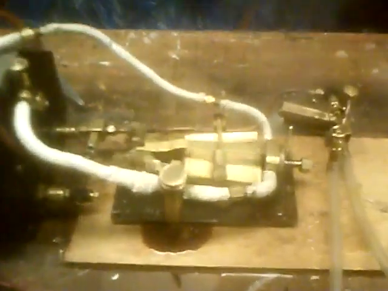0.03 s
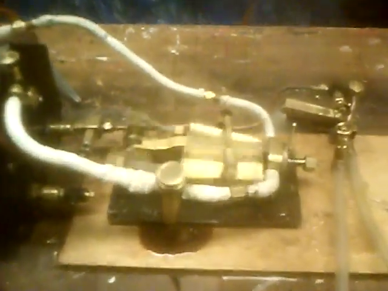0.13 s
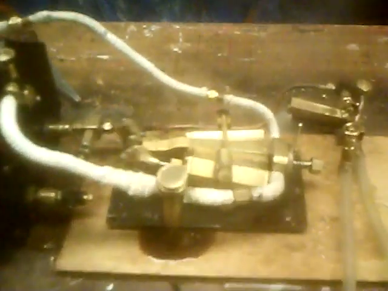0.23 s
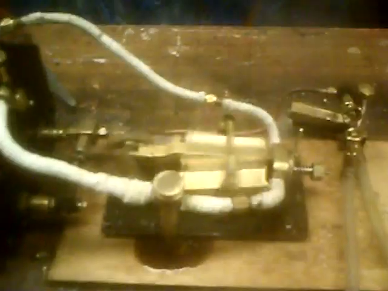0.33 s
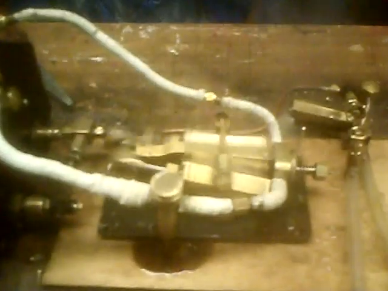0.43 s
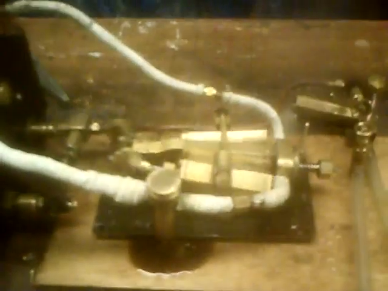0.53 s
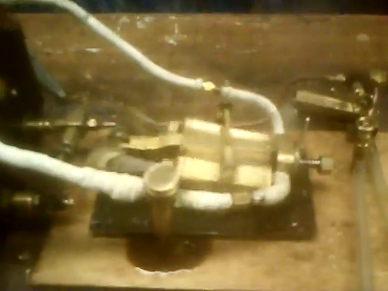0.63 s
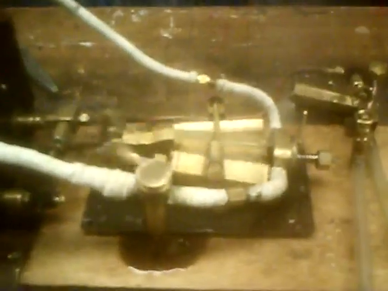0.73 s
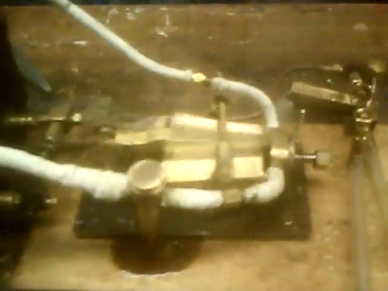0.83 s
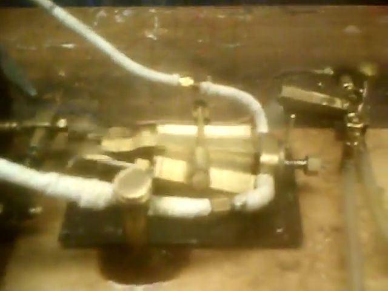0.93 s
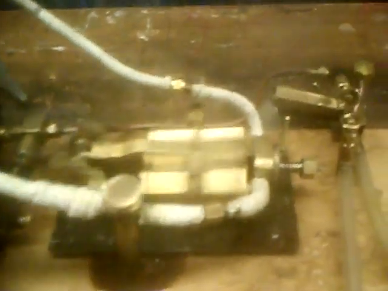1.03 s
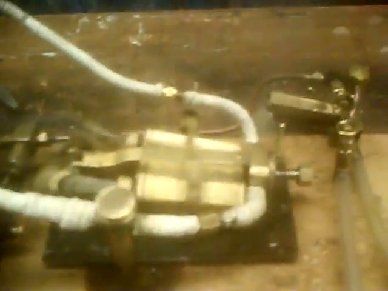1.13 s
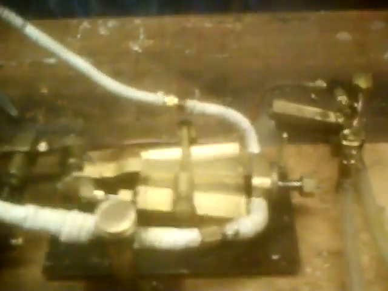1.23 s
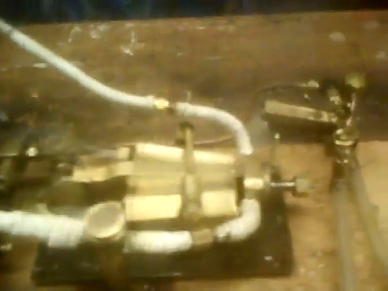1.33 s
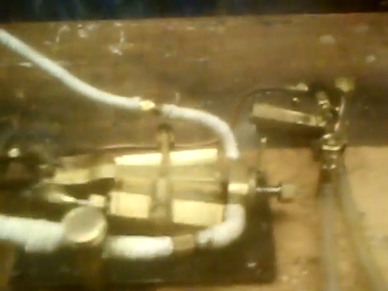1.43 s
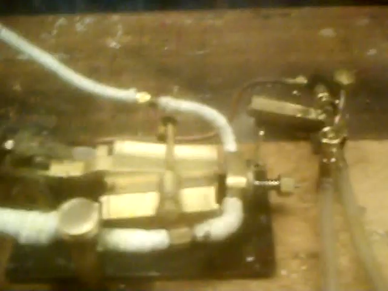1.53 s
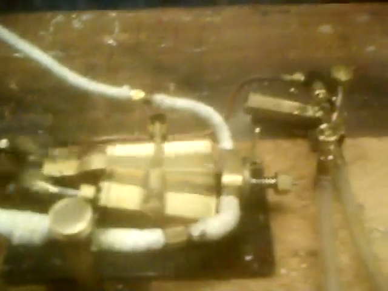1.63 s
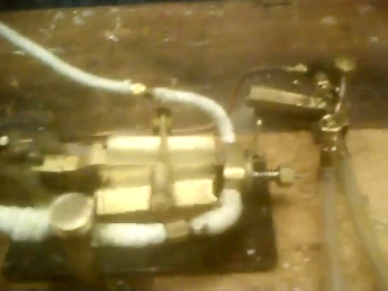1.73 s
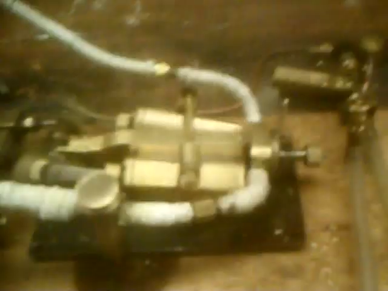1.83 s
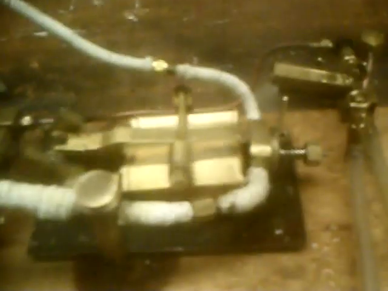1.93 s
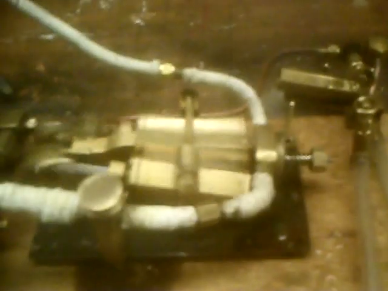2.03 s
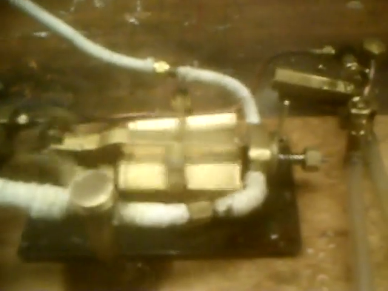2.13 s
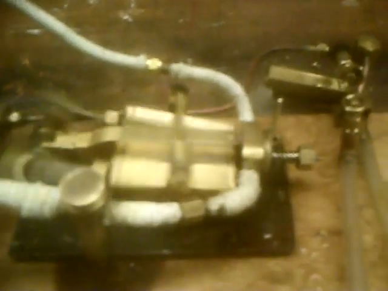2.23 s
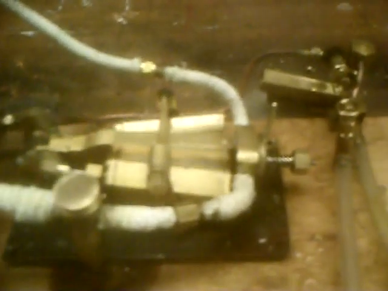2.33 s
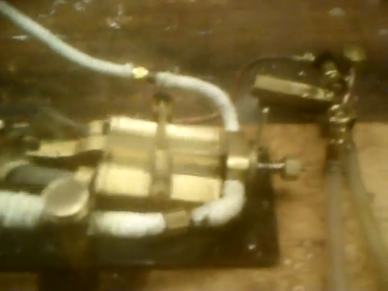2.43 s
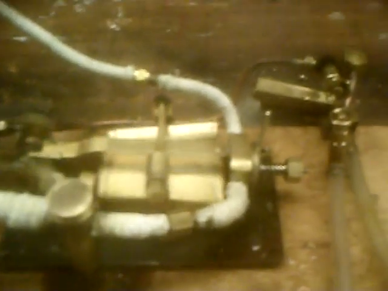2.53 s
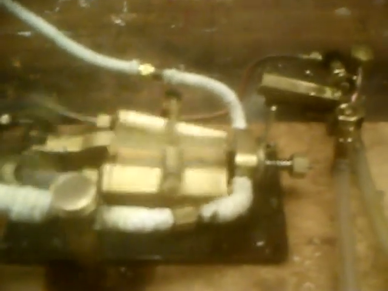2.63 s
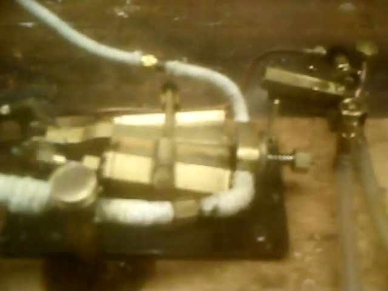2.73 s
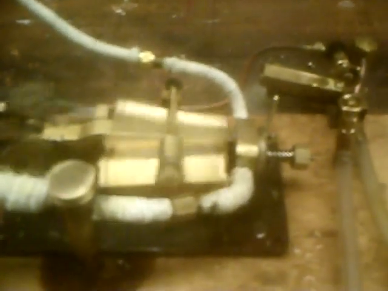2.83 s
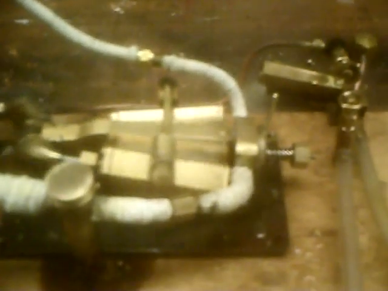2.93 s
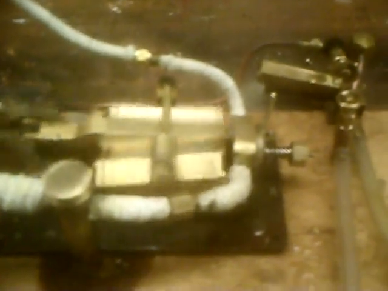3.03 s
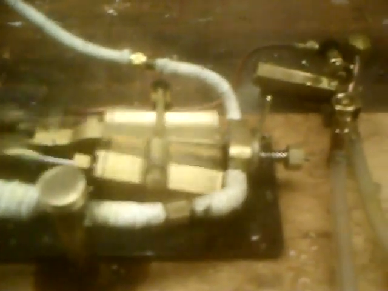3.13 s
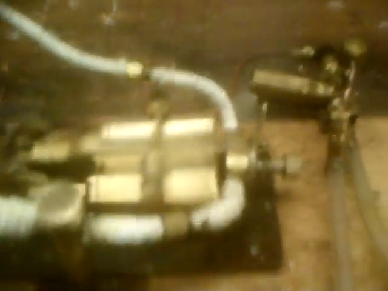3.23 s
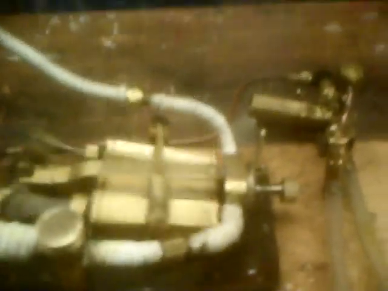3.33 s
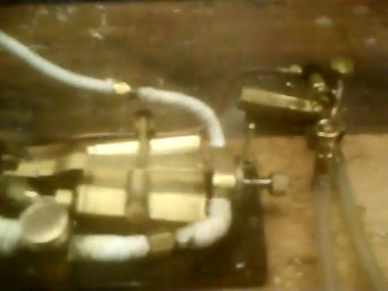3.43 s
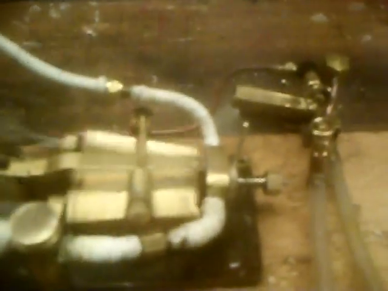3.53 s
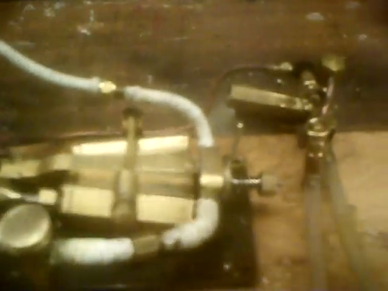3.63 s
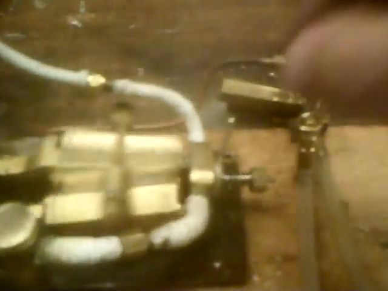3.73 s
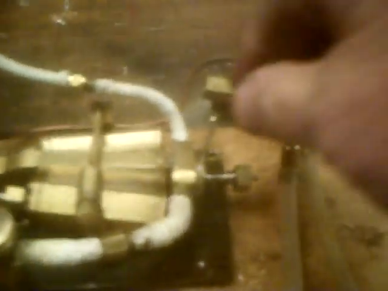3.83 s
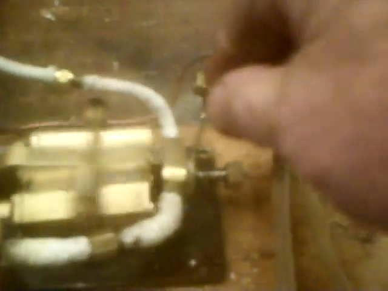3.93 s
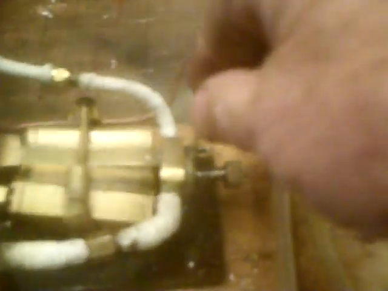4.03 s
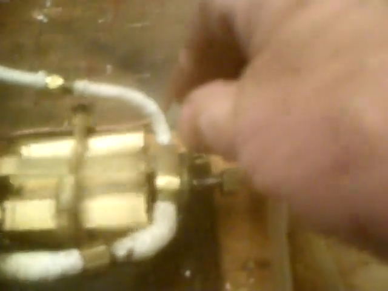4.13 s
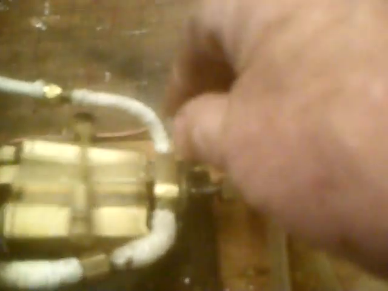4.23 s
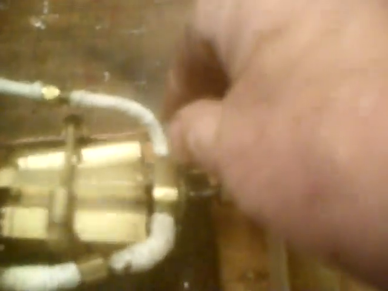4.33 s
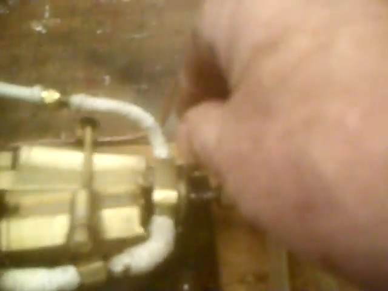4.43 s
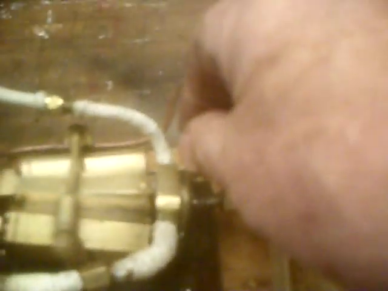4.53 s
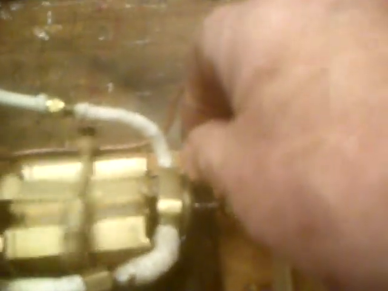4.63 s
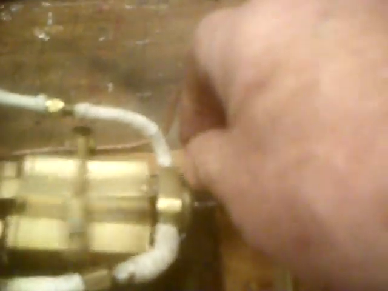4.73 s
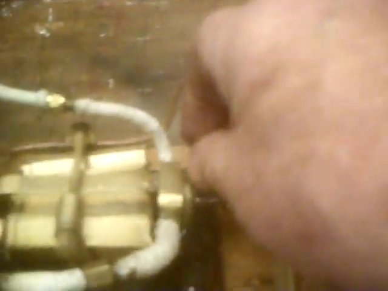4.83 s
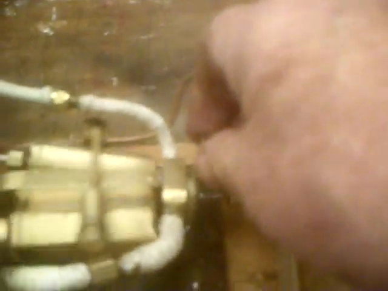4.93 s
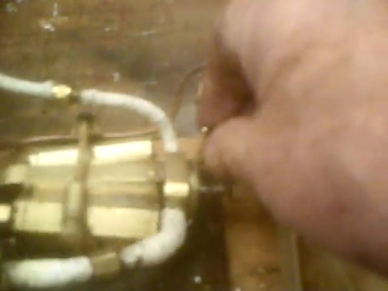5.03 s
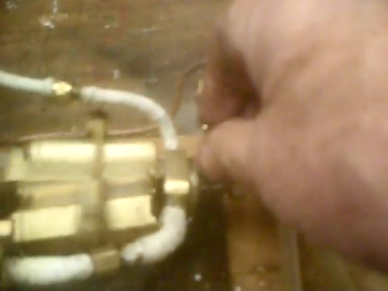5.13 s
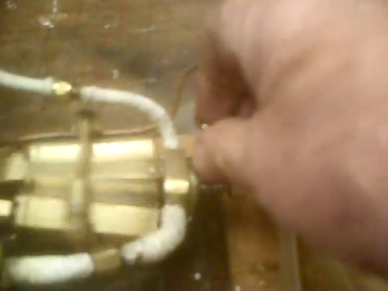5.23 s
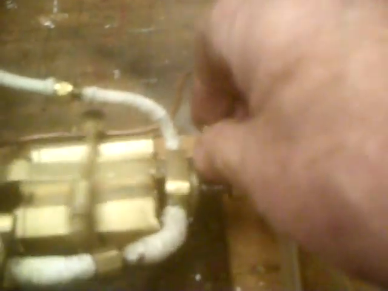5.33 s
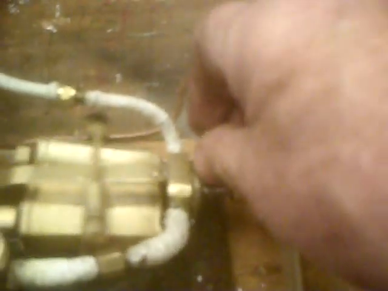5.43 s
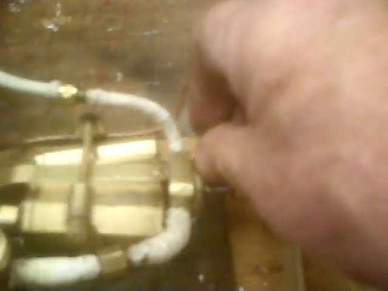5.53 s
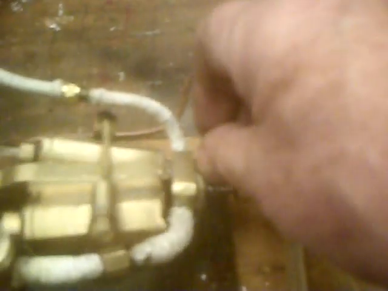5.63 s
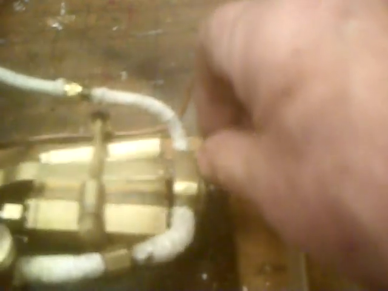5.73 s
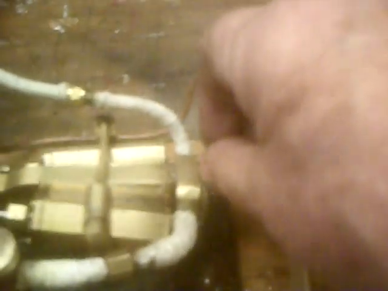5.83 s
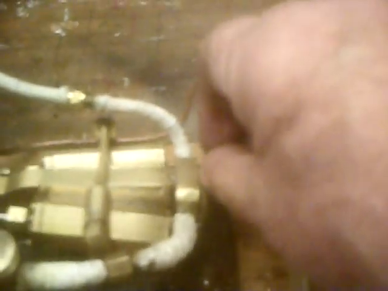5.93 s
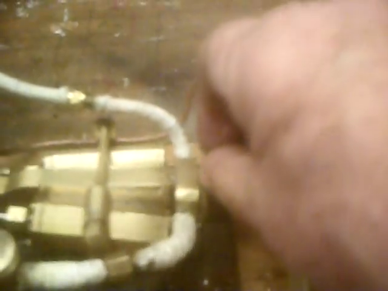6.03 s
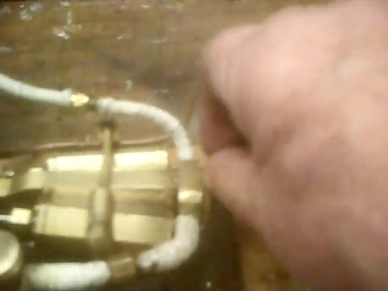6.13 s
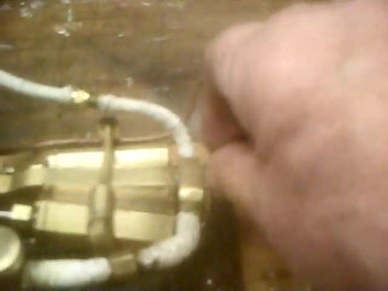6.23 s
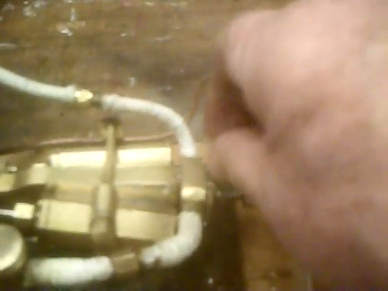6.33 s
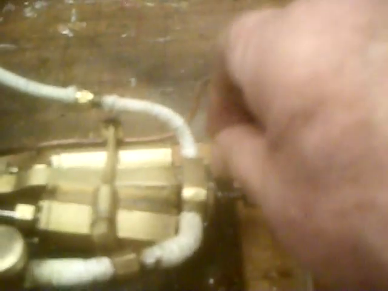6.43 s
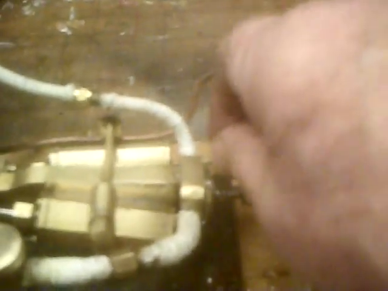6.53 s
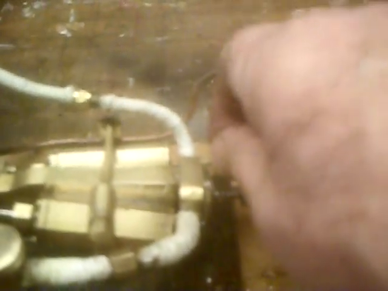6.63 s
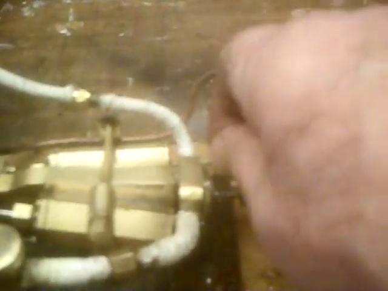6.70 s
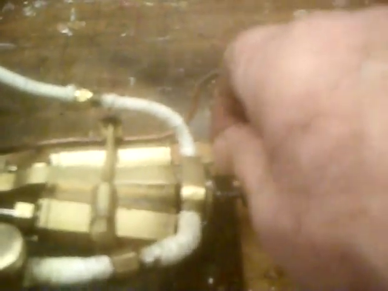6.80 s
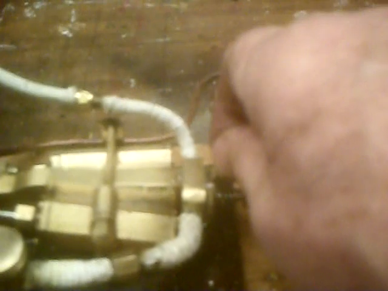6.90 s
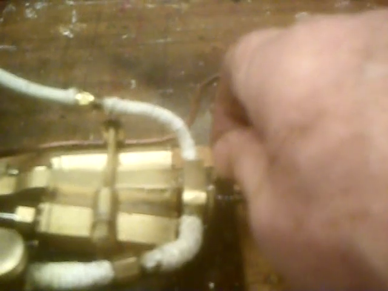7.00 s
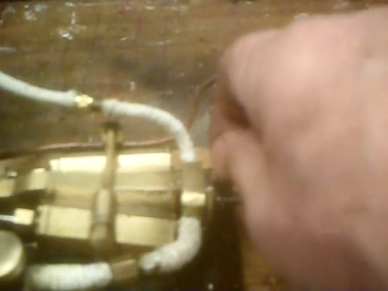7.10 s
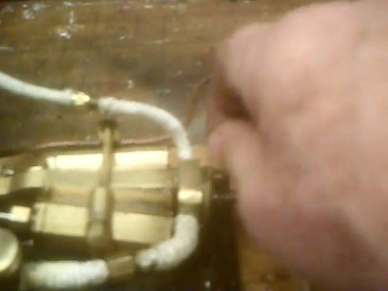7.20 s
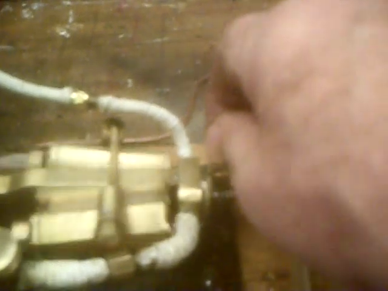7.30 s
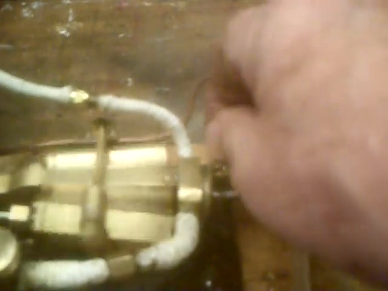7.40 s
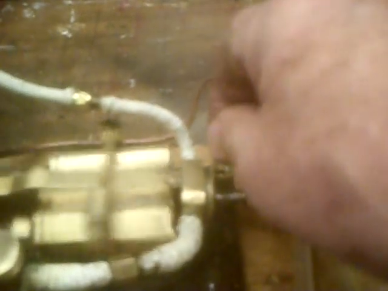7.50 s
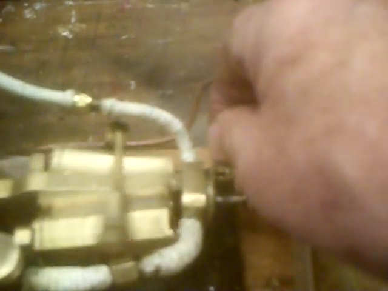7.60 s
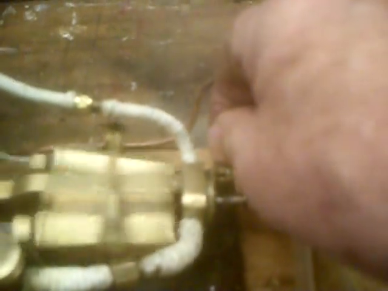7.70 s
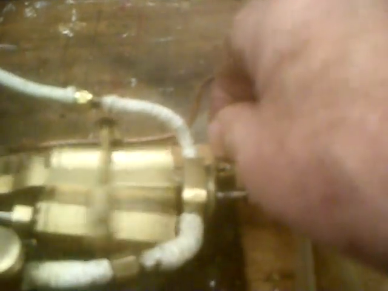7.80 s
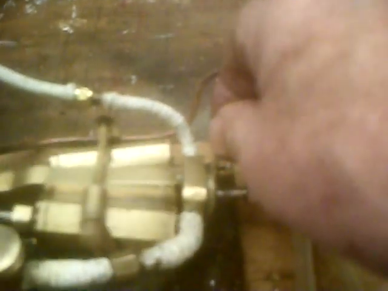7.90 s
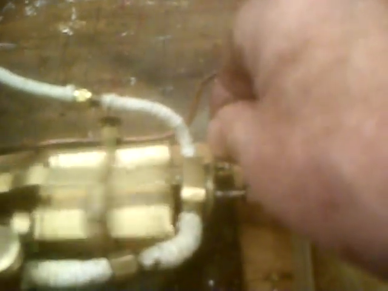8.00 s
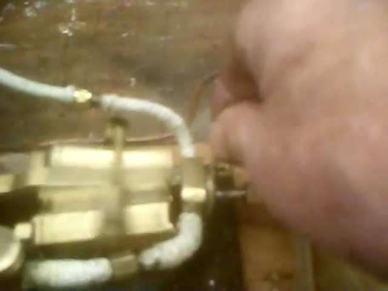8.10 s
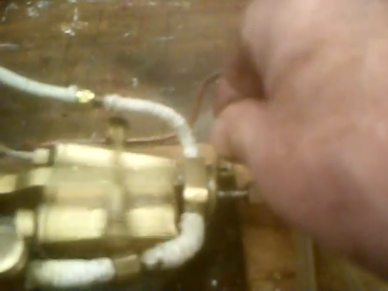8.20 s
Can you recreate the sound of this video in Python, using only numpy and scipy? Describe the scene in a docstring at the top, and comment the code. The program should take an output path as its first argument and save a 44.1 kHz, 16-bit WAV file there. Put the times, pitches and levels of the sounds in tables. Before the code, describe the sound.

A small steam engine runs with quick metallic knocking, stalls with a few soft bumps, then restarts faster with squeaks and ticks.

```python
"""A small brass oscillating steam engine on a board on a wooden workbench, close to a pocket camera's
microphone. It runs forwards at about 5.6 turns a second; slack in its bearings knocks four times a turn,
the main clack with a rebound, and lighter touches come between. Near 5.9 s a hand works the reversing
valve: the engine stalls and bumps softly a few times. From 7.4 s it runs backwards, faster and harder,
a dry bearing chirping. The quiet workshop and a faint microphone hiss lie under it all."""
import sys
import numpy as np
from scipy import signal
from scipy.fft import rfft, irfft
from scipy.io import wavfile

SR = 44100
rng = np.random.default_rng(int(sys.argv[2]) if len(sys.argv) > 2 else 0)


def store_pcm(level_fs):
    """Save levels as 16-bit WAV."""
    pcm = np.round(np.clip(level_fs, -1, 1) * 32767).astype(np.int16)
    wavfile.write(sys.argv[1], SR, np.atleast_2d(pcm).T)


N = 364266
TIME, TAIL = np.arange(N) / SR, np.arange(SR // 6) / SR   # time axes of the scene and of one blow
LEAD_S = .005   # the faces graze this long before they meet


def from_db(db):
    return 10 ** (np.asarray(db) / 20)


def rms_one(x):
    return x / np.sqrt(np.mean(x ** 2) + 1e-20)


def add(out, s, sound):
    """Mixes a sound in at time s."""
    start = max(round(s * SR), 0)
    out[start:start + len(sound)] += sound[:max(N - start, 0)]


def through(x, response):
    """Passes x through an impulse response."""
    return signal.fftconvolve(x, response)[:N]


def filtered(x, hz, kind="low", order=2):
    return signal.sosfilt(signal.butter(order, hz, kind, fs=SR, output="sos"), x)


# Blows out of step, as the hand rests on the valve and then as the engine races backwards.
# Each row: start in seconds, kind of blow, extra level in dB.
LOOSE_BLOWS = [(4.897, "tap", -8), (5.07, "tap", -2), (5.24, "tap", -22), (7.414, "tap", 0.5),
               (7.4429, "knock", 6), (7.4907, "clack", 1), (7.532, "thud", -3), (7.584, "tap", -1.5),
               (7.612, "knock", 4.5), (7.6446, "clack", -0.5), (7.652, "rebound", -0.5),
               (7.679, "rebound", 1.5), (7.737, "thud", 1.5), (7.7697, "clack", -2), (7.796, "sway", 0.5),
               (7.865, "knock", 9.5), (7.8939, "clack", 1.5), (7.899, "rebound", -4), (7.919, "sway", -1),
               (7.987, "thud", 3), (8.014, "tap", 0.5), (8.047, "sway", 6), (8.089, "tap", 0),
               (8.112, "rebound", 6), (8.121, "thud", 1), (8.145, "clack", 1.5), (8.15, "rebound", 2),
               (8.168, "sway", 6), (8.231, "rebound", 1), (8.236, "thud", -4)]
def engine_blows():
    """Bearing slack knocking right in front of the microphone, forwards and then backwards."""
    out = np.zeros(N)
    for s, kind, extra_db in forward_blows() + LOOSE_BLOWS:
        add(out, s - LEAD_S, blow(kind, s, extra_db))
    return out


# The crank's forward travel. Each row: time in seconds, turns done.
CRANK_TURNS = [(0, .17), (.3293, 2), (.8469, 5), (1.1791, 7), (1.353, 8), (1.534, 9), (1.9099, 11),
               (2.0945, 12), (2.4533, 14), (2.6384, 15), (2.8166, 16), (3.0001, 17), (3.5324, 20),
               (4.0781, 23), (4.4339, 25), (5.6435, 32), (5.8322, 33), (5.89, 33.35)]
# The contacts of one turn, by kind. Each row: angle after dead centre in turns, timing scatter in seconds,
# level in dB, level scatter in dB, chink against the body in dB, colour in dB at each of COLOUR_HZ.
CONTACTS = {"clack": (0, 0.00026, -38, 0.93, 4.56, [4.5, 2.5, 0, 4, -2]),
            "rebound": (0.02786, 0.00045, -39, 0.73, -14, [-2.5, 9, 4.5, -17.5, -17]),
            "thud": (.27, .0012, -36.5, 0.54, -28.5, [0, -1.5, -14, -30, -23]),
            "sway": (.51, .002, -46, 1.0, -28, [3, -9, -17, -22, -22]),
            "tap": (.58, 0.0012, -37, 0.59, -5.5, [1.5, -2.5, -4, -23.5, -18]),
            "knock": (.752, .0012, -42, 1.7, -9, [10, 5, 4.5, -15, -18.5]),
            "touch": (.905, 0.0012, -46, 3.7, -2.7, [-1.5, -6, -6.5, -10, -20.5])}
# Blows that land harder or softer than usual, by kind. Each row: start in seconds, extra level in dB.
ACCENTS = {"clack": [(.1497, 0.5), (.3293, 0), (.4994, 1), (.8465, 2), (1.0128, 2), (1.534, 4), (1.722, 3),
           (2.0945, 3.5), (2.4533, 2.5), (2.6384, 3.5), (2.8166, 3), (3.0001, 3.5), (3.1768, 2),
           (3.3555, 3.5), (3.8965, 3), (4.0778, 2), (4.2557, -0.5), (4.6056, -2), (4.7785, 2), (5.1282, 1)],
           "knock": [(.11, 6.5), (.284, 6), (.629, 3.5), (.803, 6.5), (1.1377, 7.5), (1.487, 3.5),
           (1.673, 8), (1.86, 3), (2.051, 9.5), (2.2315, 10), (2.5943, 8), (2.773, 3.5), (2.954, 6),
           (3.1337, 7.5), (3.3122, 8.5), (3.492, 7.5), (3.672, 5.5), (3.849, 6), (4.213, 5.5), (4.5655, 7),
           (4.734, 6.5), (5.43, 2), (5.604, 5), (5.786, 6)], "tap": [(1.642, -0.5), (1.83, -3), (2.016, -4),
           (2.198, -0.5), (2.56, -5)]}
def forward_blows():
    """Slack closes at the same crank angles on every turn; returns rows like LOOSE_BLOWS."""
    rows = []
    run_s, turns = np.transpose(CRANK_TURNS)
    for kind, (angle, jitter_s, _, scatter_db, _, _) in CONTACTS.items():
        passes = np.arange(np.ceil(turns[-1])) + angle
        passes = passes[(passes > turns[0]) & (passes < turns[-1])]
        for due_s in np.interp(passes, turns, run_s):
            late, harder = rng.standard_normal(2)
            accents = [row for row in ACCENTS.get(kind, []) if abs(row[0] - due_s) < .015]
            s, extra_db = accents[0] if accents else (due_s + jitter_s * late, scatter_db * harder)
            rows.append((s, kind, extra_db))
    return rows


# How the engine runs over time, and how full its deepest notes sound. Each row: time in seconds, # force of the
# blows in dB, sliding friction in dB, lift of the modes below 225 Hz in dB.
RUNNING_LEVELS = [(0, -3.5, -45.5, 3), (1.9, -0.75, -45.5, 2), (3.1, -1, -45.5, 3), (4.2, 0.5, -47, 5.5),
                  (5.6, 1.7, -46, 2), (5.84, 0, -51, 8), (5.93, -32, -58, 23), (6.05, -20, -75, 0),
                  (7.3, -20, -72, 7), (7.39, 0, -48.5, 3.5), (7.56, 3, -46, 0.5), (7.7, 3, -36.5, 4),
                  (8.26, 2, -36, 5)]
# The chink as the bearings settle and loosen. Each row: time in seconds, extra level in dB.
CHINK_LEVEL = [(1.0, 3.5), (1.2, -3), (2.6, -1.5), (3.0, 1.5), (3.55, 1), (4.6, 0), (5.6, 0)]
# What rings in engine, base and board. Each row: pitch in Hz, width in Hz, level in dB.
BODY_MODES = [(101.7, 37, -6), (175.3, 22, -3), (208.7, 28.5, 6.5), (240.2, 21.4, 6.5), (274, 16.4, 2.5),
              (325, 195, -8.5), (438, 49, -8.5), (521, 143, -8.5), (706, 109, -3), (772, 69, -2.5),
              (900, 453, -10), (1050, 150, -5), (1270, 170, -7), (1607, 180, -13), (1786, 42, -7.5),
              (2020, 190, -11.5), (2516, 250, -17.5), (3240, 520, -27), (3850, 690, -26.5),
              (5700, 3500, -32)]
def blow(kind, s, extra_db, mode_scatter_db=0.7, thump_pitch_scatter=.028, brightening=0.53):
    """Slack closes and rings engine and board, harder under load and never quite alike."""
    _, _, level_db, scatter_db, chink_db, colour = CONTACTS[kind]
    load_s, force_db, _, boom_db = np.transpose(RUNNING_LEVELS)
    modes = np.array(BODY_MODES, float)
    hz = modes[:, 0].copy()
    modes[hz < 300, 0] *= 1 + thump_pitch_scatter * rng.standard_normal()
    tilt_db = (hz < 225) * np.interp(s, load_s, boom_db)
    tilt_db += brightening * extra_db * np.log2(hz / hz.mean())   # a harder blow is brighter
    gains = mode_gains(colour) * from_db(tilt_db + mode_scatter_db * rng.standard_normal(len(hz)))
    body = through(bending(rings(modes, gains)), chatter())[:len(TAIL)]
    body /= np.std(body[round(LEAD_S * SR):][:SR // 100])   # unit level over the 10 ms after contact
    chink_db += np.interp(s, *np.transpose(CHINK_LEVEL)) + scatter_db * rng.standard_normal()
    gain = from_db(level_db + np.interp(s, load_s, force_db) + extra_db)
    return gain * (body + from_db(chink_db) * chink())


# The pitches in Hz at which a contact's colour is given.
COLOUR_HZ = [200, 500, 1000, 2200, 4500]
def mode_gains(colour):
    """Hard contacts reach the high modes, soft ones only the board."""
    mode_hz = np.array(BODY_MODES)[:, 0]
    return from_db(np.interp(np.log(mode_hz), np.log(COLOUR_HZ), colour))


def rings(modes, gains=1, size=8192):
    """Impulse response of a struck body: its resonances all answer at once."""
    hz, width, db = np.array(modes, float).T[:, :, None]
    bin_hz = np.maximum(np.arange(size // 2 + 1), 1) * SR / size
    detune = (bin_hz / hz - hz / bin_hz) * hz / width
    peaks = from_db(db) ** 2 / (1 + detune ** 2 / 2) ** 2
    power = (gains * np.ones(len(modes))) ** 2 @ peaks
    cepstrum = irfft(np.log(power + 1e-9 * power.max()) / 2)[:size // 2]
    cepstrum[1:] *= 2   # folding the cepstrum gives minimum phase
    return irfft(np.exp(rfft(cepstrum, size)))[:len(TAIL)]


def bending(response, delay_s=0.001091):
    """Bending waves cross the board faster the higher they are; delay_s is the travel time at 1 kHz."""
    hz = np.arange(len(response) // 2 + 1) * SR / len(response)
    travel = np.exp(-4j * np.pi * delay_s * np.sqrt(1000 * hz))
    return irfft(rfft(response) * travel, len(response))


def chatter(amount=0.91, gather_s=0.0014, decay_s=0.0058, low_cut_hz=240):
    """Force of one contact: the faces graze, meet, then rattle too lightly to stir the deep modes."""
    t = TAIL - LEAD_S
    envelope = np.exp(np.minimum(t / gather_s, -t / decay_s)) / np.sqrt(decay_s * SR / 2)
    force = amount * filtered(rng.standard_normal(len(t)) * envelope, low_cut_hz, "high")
    force[round(LEAD_S * SR)] = 1
    return force


def chink(start_hz=2630, end_hz=2030, fall_s=0.0019, rise_s=0.00082, edge_hz=2690, octave_db=-20,
          grain_hz=450, roughness=.3, pitch_scatter=.018, length_scatter=.1):
    """The bright, gritty, sagging note that tops a hard blow, new in pitch and length each time."""
    higher, longer = rng.standard_normal(2)
    t = np.maximum(TAIL - LEAD_S, 0) / np.exp(length_scatter * longer)
    hz = (end_hz + (start_hz - end_hz) * np.exp(-(t / fall_s) ** 2)) * (1 + pitch_scatter * higher)
    flutter, wobble = roughness * rms_one(filtered(rng.standard_normal((2, len(t))), grain_hz))
    swell = (t / rise_s / 2) ** 2 * np.exp(2 - t / rise_s) * (1 + flutter / 2)
    phase = 2 * np.pi * np.cumsum(hz) / SR + wobble
    note = signal.fftconvolve(swell * np.sin(phase), signal.firwin(301, edge_hz, fs=SR), mode="same")
    return note + from_db(octave_db) * swell ** 2 * np.sin(2 * phase)


# The dry bearing slipping on the backward run. Each row: start in seconds, relative level in dB.
SLIPS = [(7.573, -35.5), (7.6919, -20), (7.702, -23), (7.719, -30), (7.7254, -16), (7.7612, -29),
         (7.777, -32), (7.825, -26), (7.84, -30), (7.867, -28), (7.89, -24.5), (7.9573, -26.5),
         (7.9774, -22), (8.003, -25.5), (8.036, -28.5), (8.072, -25), (8.139, -22.5), (8.151, -25.5),
         (8.194, -23)]
def bearing_squeaks(pitch_hz=1305, pitch_scatter=.017, length_s=0.0077, gain_db=-0.9,
                    overtone_db=-23, overtone_ratio=2.2):
    """Each slip sings for a few cycles near one pitch, with a weak inharmonic overtone."""
    out, t = np.zeros(N), TAIL[:round(length_s * SR)]
    swell = np.sin(np.pi * (t / length_s) ** 0.47)
    for s, db in SLIPS:
        offset, glide = pitch_scatter * rng.standard_normal(2)
        hz = pitch_hz * (1 + offset + glide * (2 * t / length_s - 1))
        phase = 2 * np.pi * np.cumsum(hz) / SR
        tone = np.sin(phase) + from_db(overtone_db) * np.sin(overtone_ratio * phase)
        add(out, s, from_db(db + gain_db) * swell * tone)
    return out


# Brass parts ringing after a tick. Each row: pitch in Hz, width in Hz, level in dB.
BRASS_MODES = [(2270, 510, 11), (2860, 450, 5), (3223, 41, 8), (3600, 160, -2), (4070, 600, -4.5),
               (5044, 590, -2.5), (6280, 2100, -6.5), (6950, 5200, 4)]
# Sharp metal ticks. Each row: start in seconds, relative level in dB, favoured pitch in Hz.
TICKS = [(0.8463, -55, 3465), (3.2445, -45, 3500), (3.2665, -50, 4960), (3.8978, -44, 4230),
         (4.7793, -44, 4080), (5.129, -45, 4050), (7.6478, -42, 4160), (7.7252, -35.5, 5020),
         (7.7272, -36, 3265), (7.8258, -41, 5270), (7.8503, -43, 6750), (7.8915, -40, 3880),
         (7.9725, -39, 6750), (8.0055, -43.5, 3400), (8.0712, -44, 3570), (8.0995, -39.5, 6700),
         (8.131, -44.5, 3730), (8.1415, -42.5, 4540), (8.1938, -42.5, 4370), (8.2235, -40, 6760)]
def brass_ticks(gain_db=8, scatter_db=3.5, skid=0.11, skid_s=0.0044, db_per_octave=25,
                slip_db=-20.5, slip_hz=3200):
    """Brass meets brass with a dry crack and a brief skid, driving the modes near one pitch most."""
    out, t = np.zeros(N), TAIL[:SR // 60]
    slip_ticks = [(s, db + slip_db, slip_hz) for s, db in SLIPS]   # each slip breaks loose with a tick
    for s, db, hz in TICKS + slip_ticks:
        force = skid * rng.standard_normal(len(t)) * np.exp(-t / skid_s)
        force[0] = 1
        octaves_off = np.abs(np.log2(np.array(BRASS_MODES)[:, 0] / hz))
        gains = from_db(rng.normal(0, scatter_db, len(BRASS_MODES)) - db_per_octave * octaves_off)
        tick = signal.fftconvolve(rings(BRASS_MODES, gains), force)
        add(out, s, from_db(db + gain_db) * tick / np.abs(tick).max())
    return out


# Soft bumps while the valve is worked. Each row: start in seconds, peak in dB, pitch in Hz, width in Hz.
BUMPS = [(5.935, -41.5, 130, 120), (6.063, -38.5, 306, 180), (6.249, -45, 240, 66), (6.377, -38, 288, 140),
         (6.723, -55, 218, 10), (7.071, -39, 252, 35), (7.206, -39, 377, 220), (7.335, -37, 320, 150)]
def valve_bumps(soft_hz=380, hardness=2.5):
    """Dull, hand-damped nudges of the stalled engine; the shorter ones are a little harder."""
    out = np.zeros(N)
    for s, db, hz, width in BUMPS:
        ring = np.exp(-np.pi * width * TAIL) * np.cos(2 * np.pi * hz * TAIL)
        bump = bending(filtered(ring, soft_hz + hardness * width))
        add(out, s, from_db(db) * bump / np.abs(bump).max())
    return out


# The colour of sliding contact, in dB at each of COLOUR_HZ.
SLIDE_COLOUR = [-2.5, -1, -4, -6.5, -7.5]
def friction(grains_per_s=1500, spread_db=3.5):
    """Sliding faces feed a stream of tiny impacts into engine and board."""
    load_s, _, friction_db, _ = np.transpose(RUNNING_LEVELS)
    sizes = rng.choice([-1, 1], N) * from_db(spread_db * np.minimum(rng.exponential(1, N), 4))
    grains = sizes * (rng.random(N) < grains_per_s / SR)
    rubbing = through(grains, rings(BODY_MODES, mode_gains(SLIDE_COLOUR)))
    return from_db(np.interp(TIME, load_s, friction_db)) * rms_one(rubbing)


# Bench top, back board and shelves around the microphone. Each row: delay in seconds, level in dB.
ECHOES = [(.0029, -27), (.0056, -15.5), (0.0107, -12.5), (0.017, -14), (0.0223, -15.5)]
def bench_echoes(x, dull_hz=2200):
    """Near surfaces repeat every blow within milliseconds, a little duller."""
    out, dull = np.zeros(N), filtered(x, dull_hz, order=1)
    for delay_s, db in ECHOES:
        add(out, delay_s, from_db(db) * dull)
    return out


def workshop_reverb(x, t60_s=0.19, level_db=-13, build_s=0.0049, low_cut_hz=330):
    """The room answers with a short diffuse tail, thin in the bass."""
    t = np.arange(SR // 2) / SR
    envelope = from_db(-60 * t / t60_s) * (1 - np.exp(-t / build_s)) ** 2
    tail = filtered(rng.standard_normal(len(t)) * envelope, low_cut_hz, "high")
    return from_db(level_db) * through(x, tail / np.linalg.norm(tail))


# The noise floor at the microphone. Each row: frequency in Hz, relative spectral level in dB.
NOISE_FLOOR = [(25, 1), (45, -3), (70, 1.5), (320, -11), (550, -10), (1500, -14.5), (2450, -15.5),
               (2680, -13.5), (2950, -16), (7200, -17), (8700, -22.5)]
def room_tone(level_db=-57.5):
    """The quiet workshop and the microphone's own steady hiss."""
    hz, db = np.transpose(NOISE_FLOOR)
    bin_hz = np.maximum(np.arange(N // 2 + 1) * SR / N, 1)
    shape = from_db(np.interp(np.log(bin_hz), np.log(hz), db))
    return from_db(level_db) * rms_one(irfft(rfft(rng.standard_normal(N)) * shape, N))


def camera_flutter(level_db=-51, frame_hz=29.9, pulse_s=0.00086, gap_s=0.00863):
    """A faint electrical flutter: the camera draws two current pulses a frame."""
    def pulses(t):
        from_pulse_s = ((t * frame_hz + .5) % 1 - .5) / frame_hz
        return np.exp(-(from_pulse_s / pulse_s) ** 2)
    return from_db(level_db) * (pulses(TIME) - pulses(TIME + gap_s))


def scene():
    """The engine close up, bench and workshop behind it, in mono."""
    blows = engine_blows()
    direct = blows + bearing_squeaks() + brass_ticks() + valve_bumps() + friction()
    return (direct + bench_echoes(blows) + workshop_reverb(direct) + room_tone() + camera_flutter())[None]


def record(dry):
    """The camera's narrow-band microphone cuts the top above 8.2 kHz."""
    low_pass = signal.firwin(101, 8200, window=("kaiser", 7), fs=SR)
    return signal.fftconvolve(dry, low_pass[None], mode="same")


dry = scene()
out = record(dry)
store_pcm(out)
```